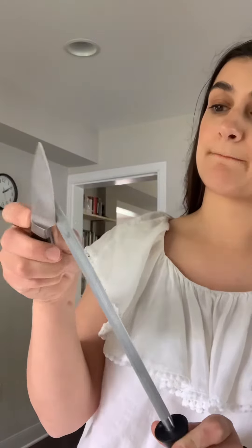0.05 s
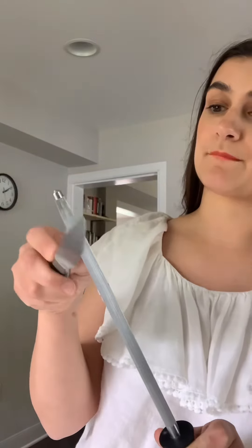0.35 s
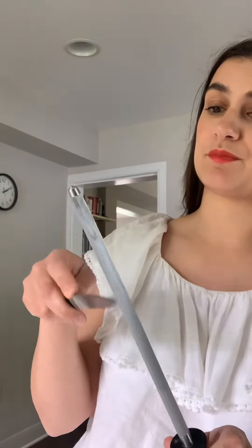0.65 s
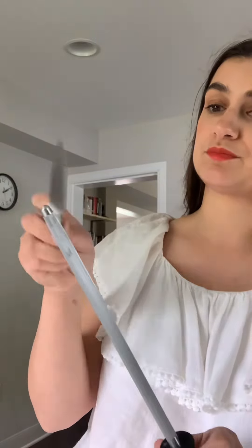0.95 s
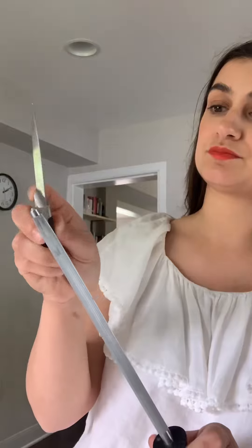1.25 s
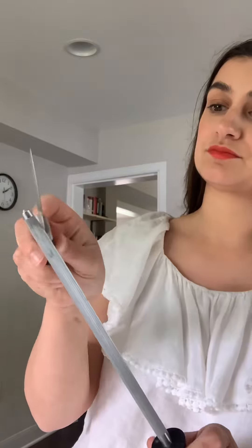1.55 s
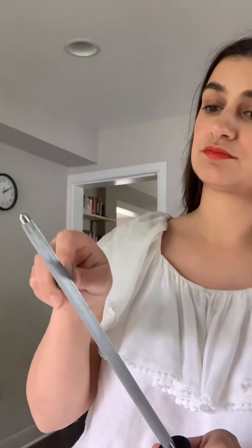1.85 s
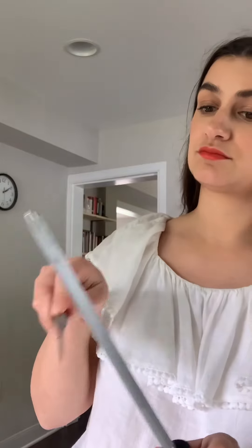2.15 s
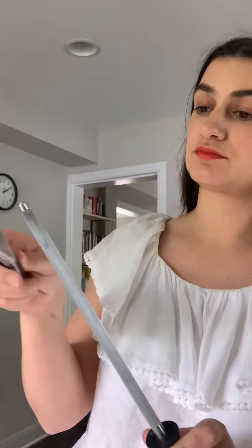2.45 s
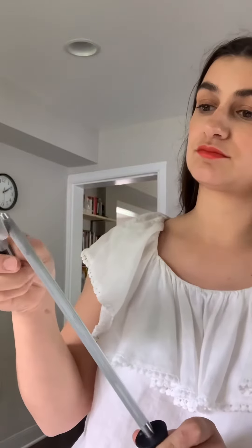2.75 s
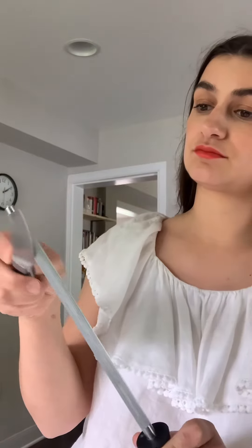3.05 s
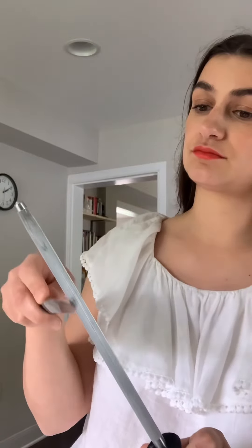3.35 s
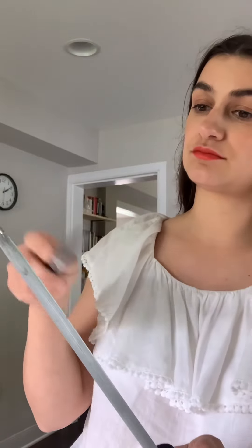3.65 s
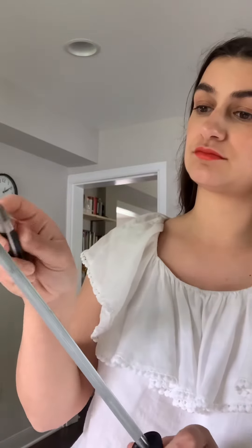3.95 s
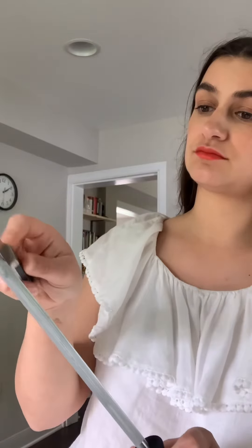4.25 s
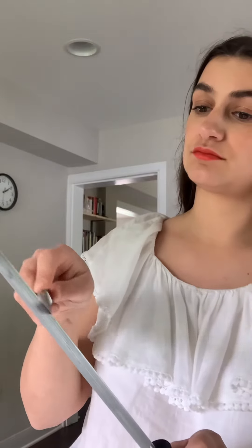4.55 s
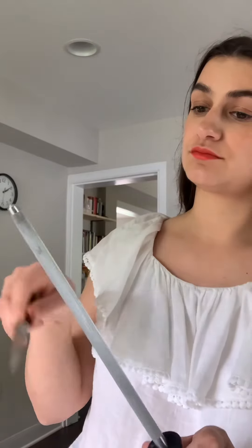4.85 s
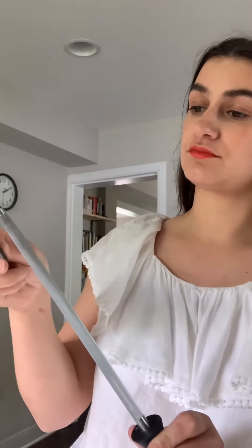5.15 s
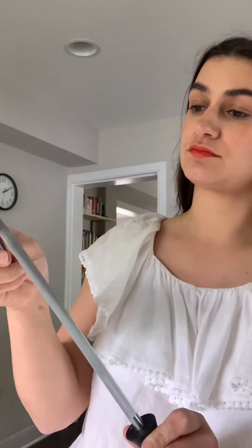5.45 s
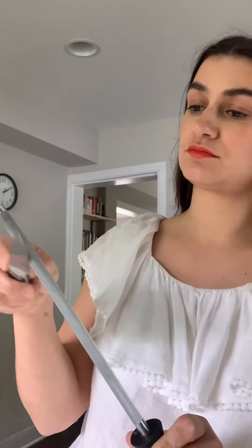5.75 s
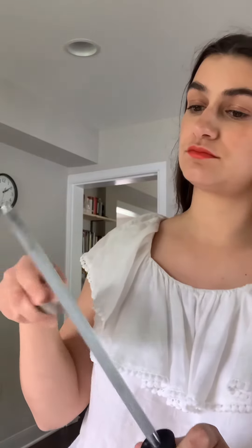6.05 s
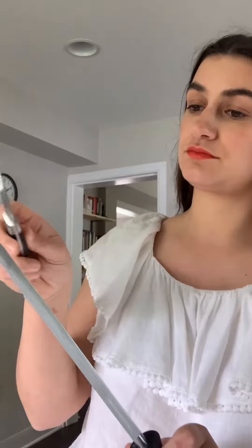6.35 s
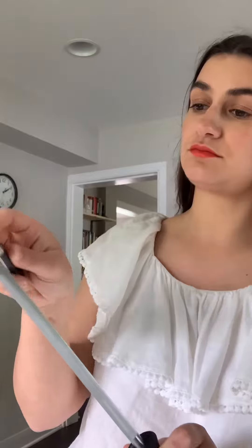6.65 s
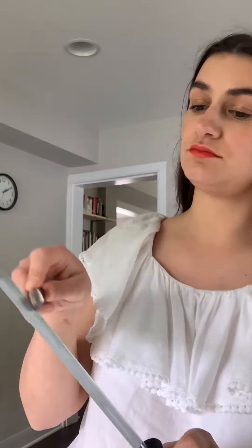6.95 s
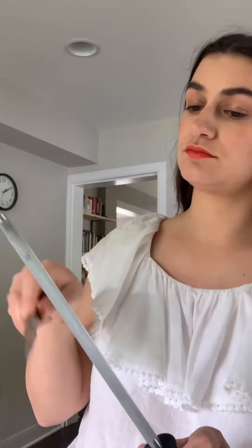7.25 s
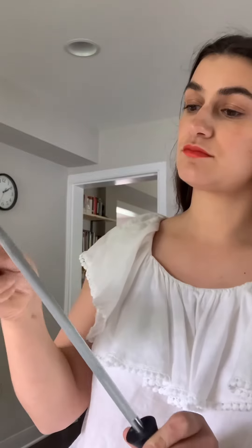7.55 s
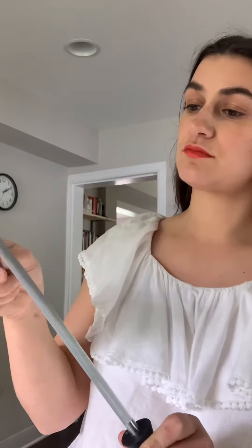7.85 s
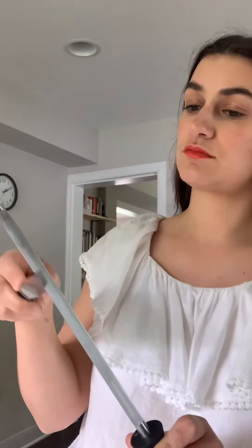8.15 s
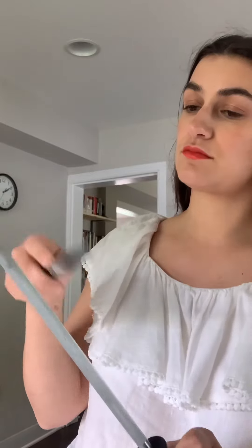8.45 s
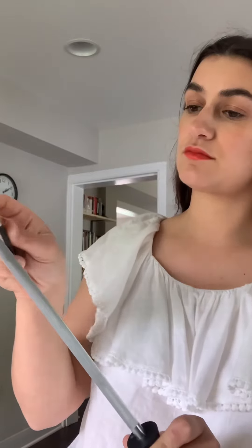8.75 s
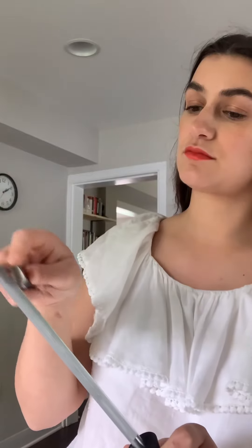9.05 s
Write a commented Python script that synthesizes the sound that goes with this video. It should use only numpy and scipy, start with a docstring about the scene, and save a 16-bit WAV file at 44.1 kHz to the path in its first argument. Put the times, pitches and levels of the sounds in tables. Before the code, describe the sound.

In a quiet room with a faint low rumble and appliance hum, a knife is honed on a steel rod close by. The blade taps the rod, rasps along it with thin gliding metallic tones, then flicks off with a short, bright ring. Eight strokes come a little over a second apart, quickening slightly, and the last ends without the ring. A soft, distant knock falls between the third and fourth.

```python
"""A kitchen knife drawn eight times along a honing steel, close up in a quiet room.
Each stroke starts with a heel tap; friction then drives resonances that glide as the contact slides.
On all but the last stroke the tip flicks off with a bright zing and leaves the steel ringing.
One dull knock further off; appliance hum and low room rumble underneath. Stereo."""
import sys
import numpy as np
from scipy import signal
from scipy.fft import rfft, irfft
from scipy.io import wavfile

SR = 44100
rng = np.random.default_rng(int(sys.argv[2]) if len(sys.argv) > 2 else 0)


def waveform_to_disk(signal):
    """Save audio, clipped to [-1, 1], as 16-bit WAV at the path in sys.argv[1]."""
    frames = np.transpose(np.atleast_2d(signal))
    scaled = np.clip(frames, -1, 1) * 32767
    samples = np.round(scaled).astype(np.int16)
    wavfile.write(sys.argv[1], SR, samples)


N = 411012

# Place runs from 0 (heel) to 1 (tip). Table levels are relative.
# Strokes: (start [s], heel dwell [s], end [s], slide exponent [1 = even], heel level [dB],
# slide level [dB], heel treble [dB])
STROKES = [(0.016, 0.18, .63, 0.98, -45.5, -41.5, -1), (1.41, 0.17, 2.075, 0.91, -47, -41.5, -26),
           (2.728, 0.28, 3.424, 0.94, -47.5, -40, -8), (4.036, 0.18, 4.682, 0.86, -37.5, -41.5, -14),
           (5.381, 0.21, 6.012, 1.03, -40, -40.5, -4), (6.505, 0.1936, 7.089, 0.863, -31, -38, -13.5),
           (7.714, 0.16, 8.262, 1.12, -40, -39.5, -3), (8.77, 0.19, 9.38, 0.82, -31, -40.5, -8.5)]
# Modes pulled upward by the contact, one pitch arch between nodes: (rest pitch [Hz], width [Hz],
# first node [place], last node [place], node crowding [1 = even], first level [dB], last level [dB],
# back face [dB], at node [dB], steadiness [0-1], arch lifts [Hz]); silent if first node is well past last
GLIDES = [(1287.5, 55, 0.12, .72, 1.45, -6, -29.5, -5, -4, .7, [160]),
          (2960, 240, 0.18, 0.85, 0.9, 4.5, -26.5, 2.5, -17, .25, [914]),
          (3750, 87, 1, 0.54, 0.94, -5.5, -10.5, 1, -4.5, .4, [150]),
          (5596, 190, 0.23, .94, 1.2, -6.5, -10.5, 3.5, -4.5, .25, [450, 850, 260]),
          (7250, 150, 0.19, 1, 0.58, -12.5, -19, -1.5, -3, .3, [350, 420, 300]),
          (7880, 200, 0.36, .85, 1, -15, -21, 3.5, -5.5, .2, [400, 600, 290]),
          (8700, 170, 0.24, .842, 0.99, -15, -12, -2.5, -8, .3, [450, 810, 1050]),
          (10950, 170, 0.16, 0.8, 1.2, -12, -18, -4, -5, .3, [850, 650, 500]),
          (11900, 280, 0.23, 0.9, 0.73, -6.5, -19, 0.5, -6, .2, [680, 745, 1100, 1000]),
          (14420, 350, .14, .82, 1.1, -7.5, -25, -1.5, -5, .12, [1257, 750, 250, 480])]
# Resonances driven from the ends of the edge: (pitch [Hz], width [Hz], heel drive [dB], tip drive [dB])
END_TONES = [(1724, 99, -20, -17), (2200, 460, -15, -38), (2619, 290, -5.5, -25), (2868, 170, -20.5, -3),
             (5690, 490, -4, -15.5), (6610, 340, -8, -8.5), (7170, 160, -16, -23.5),
             (10900, 110, -21.5, -10)]
# Heel groan and tip squeaks: (from [place], to [place], from pitch [Hz], to pitch [Hz], width [Hz],
# steepness, swell lateness [1 = midway], front face [dB], back face [dB])
SQUEAKS = [(0.04, 0.44, 2450, 1560, 118, 1.3, 0.5, -14.5, -18),
           (0.64, 0.992, 904, 2623, 128.4, 5.0, 2, -14.5, -21.5),
           (.8, 1, 3623, 6690, 453, 5.5, 2.0, -14, -29), (.84, 1.001, 8340, 6720, 315, 2.4, 1.8, -26, -8),
           (0.842, 1, 8340, 10060, 398, 6.5, 2.7, -18.5, -7.5)]
# Edge bites: (time [s], half length [s], gain [dB], pitch [Hz])
BITES = [(0.333, 0.034, 8.5, 3800), (.427, 0.022, 9.5, 6400), (0.523, 0.032, 9.5, 1710),
         (1.674, .022, 6, 3820), (1.686, .04, 3, 11000), (1.94, .025, 9.5, 1680), (3.086, 0.024, 10, 3650),
         (4.44, .03, -0.5, 6400), (4.504, 0.031, 12.5, 2900), (5.457, 0.045, 6, 2500),
         (6.775, .014, 4, 6000), (6.895, 0.03, 6, 6250), (5.88, .018, -1, 9600), (6.947, 0.01, 12.5, 9900),
         (7, 0.033, 12, 11100), (7.93, 0.043, 3, 11500), (8.145, .018, 4, 9600), (8.85, .045, 6, 2650),
         (8.95, 0.031, 13, 1300), (9.157, 0.026, 9, 6360), (9.163, .016, 9, 2900), (9.206, 0.011, 10, 9750),
         (9.253, 0.013, 13, 1690)]
# Friction spectrum: (frequency [Hz], level [dB])
FRICTION_SPECTRUM = [(300, -25.5), (1000, -6), (1500, 3), (2100, 0.5), (3000, 5.5), (3700, 5.5),
                     (4700, -12.5), (5400, 9), (6400, 2.5), (7100, -3), (8500, 3.5), (10100, -12),
                     (11300, -7), (13200, -10), (15500, -11)]
# Heel lands on the rod: (time [s], level [dB], tick treble [dB], upper clink modes [dB])
TAPS = [(0.0182, -23, 6, -2.5), (1.4095, -23, -28, -10.5), (2.7289, -23, -9, -5), (4.0349, -15, -21.5, -4),
        (5.38, -19.5, -15.5, -1), (6.5054, -14.5, -13.5, -9.5), (7.7154, -15, 0, -1),
        (8.7696, -19, -10.5, -12)]
# Tick spectrum: (frequency [Hz], level [dB])
TICK_SPECTRUM = [(300, -49), (1000, -12.5), (1400, -15), (1750, -7.5), (2100, -13), (2700, 3), (3300, -2),
                 (3750, -0.5), (4600, -7), (5500, 1.5), (6500, 2.5), (7700, -5.5), (8600, -2),
                 (11000, -6.5), (13000, -14.5), (15500, -11.5)]
# Steel modes damped by the contact: (frequency [Hz], level [dB], t60 [s])
CLINK_MODES = [(1206, -23.5, 0.015), (1747, -11, 0.057), (2605, -2, 0.027), (2664, -15.5, 0.24),
               (2815, -11.5, 0.08), (5660, -2, 0.036), (6540, -9, 0.1), (6630, -7.5, 0.055),
               (6800, -20, 0.077), (8560, -17, 0.02), (11400, -28, 0.059)]
# Edge catches before the tip: (time [s], level [dB], swell [s], squeak [dB])
CATCHES = [(0.582, -33, 0.005, -2.5), (2.036, -44, 0.011, -16.5), (3.36, -38, 0.0087, -6),
           (5.965, -36.5, 0.017, 3.5), (6.942, -38.5, 0.008, -5), (7.049, -40, 0.014, -17.5),
           (8.222, -29.5, 0.0059, -1.5)]
# Tip leaves the rod: (time [s], level [dB], swell [s], squeak [Hz], body [dB], top treble [dB],
# ring level at each of the four RING_BANDS_HZ [dB])
FLICKS = [(0.6318, -15, 0.0059, 5710, -0.5, 0, -50, -48, -58.5, -42.5),
          (2.0736, -13.5, 0.0015, 5760, -4, 2, -41.5, -41.5, -42.5, -42),
          (3.424, -13, 0.0062, 6520, -4, -1.5, -30, -47.5, -45.5, -49),
          (4.681, -12, 0.0019, 6690, -8.5, -2, -44, -45, -51.5, -42),
          (6.013, -13.5, 0.0074, 8230, -3.5, 1.5, -37.5, -51, -47.5, -46),
          (7.0886, -19, 0.0016, 11630, -4, 3, -40.5, -54, -50, -36.5),
          (8.2625, -8, 0.0052, 10800, -4.5, 9, -42, -52, -50, -45)]
# Ring bands: (low [Hz], main [Hz], upper [Hz], top [Hz])
RING_BANDS_HZ = (2945, 5604, 8000, 11418)
# Edge chatter spectrum: (frequency [Hz], level [dB])
CHATTER_SPECTRUM = [(500, -24.5), (1100, -10.5), (1700, -5), (2300, -1), (3200, 5.5), (3900, 4),
                    (4800, -2.5), (5700, 2.5), (7000, -0.5), (8300, -1.5), (9500, 3.5), (11300, 6),
                    (12500, -5), (13300, -3), (14300, 3.5), (15700, 5.5), (16300, -17.5)]
# Free steel modes: (frequency [Hz], level [dB], t60 [s])
STEEL_MODES = [(2960, -6, 0.18), (3160, -13, 0.23), (3820, -18.5, 0.13), (5607, 4, 0.2), (6360, -4.5, 0.18),
               (6420, -1, 0.18), (6635, -4, 0.15), (7160, -5, 0.18), (7855, -3, 0.24), (8230, -6.5, 0.17),
               (8450, -8.5, .17), (8840, -7, 0.14), (9490, -6.5, .15), (9900, -8.5, .12), (10980, -1, 0.12),
               (11450, -2, .17), (12450, -14, .1), (14320, -4.5, 0.18), (15100, -4, .21)]
# Reverb decay: (frequency [Hz], t60 [s])
ROOM_T60 = [(300, 0.66), (2500, 0.56), (6000, 0.52), (10000, 0.36), (15000, 0.24)]
# Reverb left-right likeness: (frequency [Hz], correlation [0-1])
ROOM_CORRELATION = [(300, 0.49), (1200, 0.12), (2800, 0.1), (4500, 1), (15000, 0.85)]
# Reverb colour of scrapes, taps and catches: (frequency [Hz], level [dB])
STROKE_REVERB = [(1000, 10.5), (2800, -2.5), (5000, 2), (15000, 5)]
# Reverb colour of flicks: (frequency [Hz], level [dB])
TIP_REVERB = [(1000, 9.5), (2800, 0), (4000, -3), (6000, 5.5), (10000, 6.5), (15000, 8)]
# Far knock: (time [s], level [dB], t60 [s])
KNOCK = (3.821, -38.5, 0.7)
# Knock spectrum: (frequency [Hz], level [dB])
KNOCK_SPECTRUM = [(60, -30.5), (150, -12.5), (330, -7), (450, 3.5), (560, -0.5), (720, -14.5), (1150, -7.5),
                  (1700, -17.5), (2700, -21.5), (4000, -42), (9000, -58)]
# Appliance hum lines: (frequency [Hz], level [dB], width [Hz])
HUM_LINES = [(62, -64, 12), (127.5, -61, 5), (169.9, -64, 7.4), (273.1, -56.5, 3), (327.6, -70.5, 4),
             (379.8, -65.5, 3.2)]
# Room rumble spectrum: (frequency [Hz], density [dB])
AIR_SPECTRUM = [(15, -36.5), (25, -16.5), (102, -1.5), (285, -1), (394, -3), (545, -13), (1260, -21.5),
                (1440, -23.5), (2160, -38.5), (3920, -42.5), (4490, -53.5), (10100, -38.5), (12900, -76.5),
                (14800, -59), (16000, -44)]
# Rumble left-right likeness: (frequency [Hz], correlation [0-1])
AIR_CORRELATION = [(50, 0.97), (150, 0.98), (300, 0.75), (600, 0.036), (1500, 0.061), (8000, 0.09)]


def scrape(face, start_s, dwell_s, end_s, exponent, heel_db, slide_db, treble_db, heel_share=0.2):
    """Grit drives friction noise and resonances as the contact slides from heel to tip."""
    t = np.arange(0, end_s - start_s, 1 / SR)
    slide = np.clip((t - dwell_s) / (end_s - start_s - dwell_s), 0, 1) ** exponent
    place = heel_share * np.minimum(t / dwell_s, 1) + (1 - heel_share) * slide
    on_heel = np.clip(1.5 - place / 0.16, 0, 1)
    body, top = split(coloured(grit(len(t)), FRICTION_SPECTRUM), hz=7550)
    sound = amp(-12) * (body + top * amp(-7 * on_heel))  # the thick heel rubs duller
    for hz, width_hz, gain, steady in [*glides(place, face), *end_tones(place), *squeaks(place, face)]:
        pitch_hz = hz * (1 + 0.011 * wander(t, hz=24))  # unsteady hand
        drive_db = bites(start_s + t, hz) + 2.38 * wander(t, hz=10)
        sound += gain * amp(drive_db) * resonate(grit(len(t)), pitch_hz, width_hz, steady)
    low, high = split(sound)
    sound = low + high * amp(treble_db * on_heel)
    # The hand bears on the heel, eases off, leans in again.
    pressure_db = np.interp(place, [0.083, 0.18, 0.44], [heel_db, slide_db - 4.5, slide_db])
    rasp_db = 0.5 * wander(t, hz=60)
    return start_s, sound * amp(pressure_db + rasp_db - 1) * signal.windows.tukey(len(t), 0.02)


def grit(n, spread_db=4, judder_db=3, judder_hz=130):
    """Tiny uneven collisions, bunched by the judder of the edge."""
    knots = np.arange(SR) * SR / judder_hz
    judder = np.interp(np.arange(n), knots, rng.uniform(-2.4, 4.5, SR))
    noise = rng.standard_normal(n)
    return unit_rms(noise * amp(spread_db * rng.uniform(-2.5, 1.4, n) + judder_db * judder))


def glides(place, face, fade_span=0.03):
    """Modes rise in pitch and level between nodes, a little differently each stroke."""
    for hz, width_hz, first, last, crowding, first_db, last_db, back_db, node_db, steady, lifts in GLIDES:
        along = np.clip((place - first) / (last - first), 0, 1)
        nodes_passed = len(lifts) * along ** (crowding * np.exp(0.18 * rng.uniform(-0.87, 1)))
        arch = abs(np.sin(np.pi * nodes_passed)) ** 1.4
        lifts_hz = lifts * (1 + 0.11 * rng.uniform(-1.1, 1, len(lifts)))
        lift_hz = np.take(lifts_hz, nodes_passed.astype(int), mode="clip")
        fade = np.clip(1 + np.minimum(place - first, last - place) / fade_span, 0, 1)
        level_db = first_db + (last_db - first_db) * along + back_db * face + node_db * (1 - arch)
        yield hz + lift_hz * arch, width_hz, fade * amp(level_db), steady


def end_tones(place, heel_reach=0.16, steady=0.17):
    """Fixed resonances fade as the heel leaves and return as the tip nears."""
    for hz, width_hz, heel_db, tip_db in END_TONES:
        heel_gain = amp(heel_db) * np.exp(-(place / heel_reach) ** 2)
        tip_gain = amp(tip_db - 16 * (1.5 - place))
        yield hz, width_hz, heel_gain + tip_gain, steady


def squeaks(place, face, steady=0.55):
    """Squeaks sweep along an S-curve, swelling and dying on the way."""
    for first, last, from_hz, to_hz, width_hz, steepness, lateness, *face_db in SQUEAKS:
        along = np.clip((place - first) / (last - first), 0, 1)
        sweep = (1 + np.tanh(steepness * (along - 0.5))) / 2
        swell = np.sin(np.pi * along ** lateness)
        yield from_hz + (to_hz - from_hz) * sweep, width_hz, amp(face_db[face]) * swell, steady


def bites(time_s, hz, reach_oct=0.19):
    """Gain in dB of a resonance that squeals while the edge bites near its pitch."""
    return sum(db * np.exp(-((time_s - at_s) / half_s) ** 2 - (np.log2(hz / bite_hz) / reach_oct) ** 2)
               for at_s, half_s, db, bite_hz in BITES if time_s[0] < at_s < time_s[-1])


def tap(at_s, db, treble_db, upper_db, body_t60_s=0.037, treble_t60_s=0.013, attack_s=0.00062):
    """The heel strikes the rod: a sharp tick and a damped clink."""
    t = np.arange(SR // 6) / SR
    low, high = split(coloured(rng.standard_normal(len(t)), TICK_SPECTRUM))
    tick = low * amp(-60 * t / body_t60_s) + high * amp(3 + treble_db - 60 * t / treble_t60_s)
    clink = np.zeros(len(t))
    for hz, mode_db, t60_s in CLINK_MODES:
        envelope = amp(mode_db + upper_db * (hz > 4000) - 60 * t / t60_s)
        clink += envelope * np.sin(2 * np.pi * (hz * t + rng.random()))
    return at_s, amp(db) * (amp(-2) * tick + amp(-3) * clink) * np.minimum(t / attack_s, 1)


def zing(at_s, db, swell_s, squeak_hz, body_db, top_db,
         squeak_db=-1, squeak_width_hz=450, release_s=0.0036, fall=0.08):
    """The edge chatters ever harder on the steel's modes with a falling squeak, then lets go."""
    t = np.arange(-SR // 25, SR // 25) / SR
    chatter = coloured(rng.standard_normal(len(t)), CHATTER_SPECTRUM)
    modes = sum(amp(mode_db) * resonate(rng.standard_normal(len(t)), hz, width_hz=170, steady=0.74)
                for hz, mode_db, _ in STEEL_MODES)
    pitch_hz = squeak_hz * (1 - fall * np.tanh(t / swell_s))
    squeak = resonate(rng.standard_normal(len(t)), pitch_hz, squeak_width_hz, steady=0.72)
    body, rest = split(chatter + amp(6) * unit_rms(modes), hz=3620)
    middle, top = split(rest, hz=9000)
    sound = unit_rms(amp(body_db) * body + middle + amp(top_db) * top + amp(squeak_db) * squeak)
    envelope = np.exp(np.where(t < 0, -(abs(t) / swell_s) ** 1.8, -abs(t) / release_s))
    return at_s + t[0], amp(db) * envelope * sound


def catch(at_s, db, swell_s, squeak_db):
    """The edge catches on the rod: a duller zing with a low squeak."""
    return zing(at_s, db, swell_s, squeak_hz=2500, body_db=-5.5, top_db=-10,
                squeak_db=squeak_db, squeak_width_hz=130, release_s=0.0079, fall=0.011)


def ring(at_s, bands_db, scatter_db=1.5, blur_hz=24, pitch_scatter=0.004, attack_s=0.0022):
    """The released steel rings, blurred by the moving hand; mode pitches differ slightly per flick."""
    t = np.arange(SR // 2) / SR
    spectrum = list(zip(RING_BANDS_HZ, bands_db))
    sound = np.zeros(len(t))
    for hz, mode_db, t60_s in STEEL_MODES:
        level_db = mode_db + curve_at(spectrum, hz) + scatter_db * rng.standard_normal()
        noise = rng.standard_normal(SR)
        pitch_hz = hz * (1 + pitch_scatter * rng.uniform(-1, 1))
        mode = resonate(noise, pitch_hz, blur_hz, steady=0.53)[-len(t):]
        sound += amp(level_db - 60 * t / t60_s) * mode
    return at_s, amp(7) * sound * np.minimum(t / attack_s, 1)


def room(x, colour, wet_db=-5.5, predelay_s=0.0043, left_lag_samples=5):
    """Direct sound plus dense reflections that die sooner in the treble, at two spaced points."""
    hz, frame_s, (a, b) = signal.stft(rng.standard_normal((2, SR * 3 // 4)), SR, nperseg=256)
    hz = hz[:, None]
    correlation = curve_at(ROOM_CORRELATION, hz)
    noise = np.array([a, correlation * a + np.sqrt(1 - correlation ** 2) * b])
    decay = amp(curve_at(colour, hz) - 60 * frame_s / curve_at(ROOM_T60, hz))
    tail = signal.istft(noise * decay, SR, nperseg=256)[1]
    tail *= np.clip(np.arange(tail.shape[1]) / SR / predelay_s - 1, 0, 1)
    wet = signal.fftconvolve(x[None], tail / np.linalg.norm(tail[0]), axes=1)[:, :N]
    left, right = x + amp(wet_db) * wet
    return np.array([np.pad(left, (left_lag_samples, 0))[:N], right])


def knock(at_s, db, t60_s, attack_s=0.0082):
    """A far knock, arriving mostly as diffuse room sound."""
    t = np.arange(SR // 2) / SR
    stereo = np.zeros((2, N))
    shared = rng.standard_normal(len(t))
    for channel in stereo:
        thud = coloured(shared + 5.2 * rng.standard_normal(len(t)), KNOCK_SPECTRUM)
        add(channel, at_s, thud * amp(db - 60 * t / t60_s) * np.minimum(t / attack_s, 1))
    return stereo


def background(low_cut_hz=42):
    """Low room rumble and the wavering lines of an appliance's hum."""
    correlation = curve_at(AIR_CORRELATION, np.fft.rfftfreq(N, 1 / SR))
    a, b = rfft(rng.standard_normal((2, N)))
    mid, side = a * np.sqrt(1 + correlation), b * np.sqrt(1 - correlation)
    air = np.array([coloured(irfft(bins, N), AIR_SPECTRUM) for bins in (mid + side, mid - side)])
    hum = sum(amp(db) * resonate(rng.standard_normal(N), hz, width_hz, steady=0.91)
              for hz, db, width_hz in HUM_LINES)
    low_cut = signal.butter(4, low_cut_hz, "highpass", fs=SR, output="sos")
    balance = amp([[-0.6], [0.6]])
    return signal.sosfilt(low_cut, amp(-52.5) * air + hum) * balance


def resonate(x, hz, width_hz, steady):
    """Steep resonance tracking hz, unit rms; steady near 1 flattens its envelope."""
    carrier = np.exp(2j * np.pi * np.cumsum(hz * np.ones(len(x))) / SR)
    pole = np.exp(-np.pi * width_hz / SR)
    baseband = signal.lfilter([(1 - pole) ** 2], [1, -2 * pole, pole * pole], x / carrier)
    return unit_rms((carrier * baseband / (abs(baseband) + 1e-12) ** steady).real)


def wander(t, hz):
    """Smooth random drift near hz, rms about 1."""
    rates_hz = hz * rng.uniform(0.3, 1.5, 8)
    coarse_s = t[::32]
    drift = sum(np.sin(2 * np.pi * (rate * coarse_s + rng.random())) for rate in rates_hz) / 2
    return np.interp(t, coarse_s, drift)


def coloured(x, spectrum):
    """x shaped by a spectrum, unit rms."""
    gain = amp(curve_at(spectrum, np.fft.rfftfreq(len(x), 1 / SR)))
    return unit_rms(irfft(rfft(x) * gain, len(x)))


def split(x, hz=4600):
    """Low-passed x and the remainder."""
    low = signal.sosfiltfilt(signal.butter(3, hz, fs=SR, output="sos"), x)
    return low, x - low


def curve_at(points, hz):
    """Interpolate on a log-frequency axis."""
    points_hz, values = np.transpose(points)
    return np.interp(np.log(hz + 1), np.log(points_hz + 1), values)


def amp(db):
    """dB to gain."""
    return 10 ** (np.asarray(db) / 20)


def unit_rms(x):
    """Scale to rms 1."""
    return x / np.sqrt(np.mean(x ** 2) + 1e-20)


def add(mix, at_s, sound):
    """Mix in a sound at at_s."""
    part = mix[max(round(at_s * SR), 0):][:len(sound)]
    part += sound[:len(part)]


def scene():
    """Strokes on alternate blade faces, in the room, over knock and background."""
    strokes, tip = np.zeros((2, N))
    for k, row in enumerate(STROKES):
        add(strokes, *scrape(k % 2, *row))
    for row in TAPS:
        add(strokes, *tap(*row))
    for row in CATCHES:
        add(strokes, *catch(*row))
    for at_s, db, swell_s, squeak_hz, body_db, top_db, *bands_db in FLICKS:
        add(tip, *zing(at_s, db, swell_s, squeak_hz, body_db, top_db))
        add(tip, *ring(at_s, bands_db))
    return room(strokes, STROKE_REVERB) + room(tip, TIP_REVERB) + knock(*KNOCK) + background()


def record(dry):
    """Steep low-pass at 15950 Hz."""
    low_pass = signal.firwin(255, 15950, window=("kaiser", 8), fs=SR)
    return signal.oaconvolve(dry, low_pass[None], "same")


dry = scene()
out = record(dry)
waveform_to_disk(out)
```